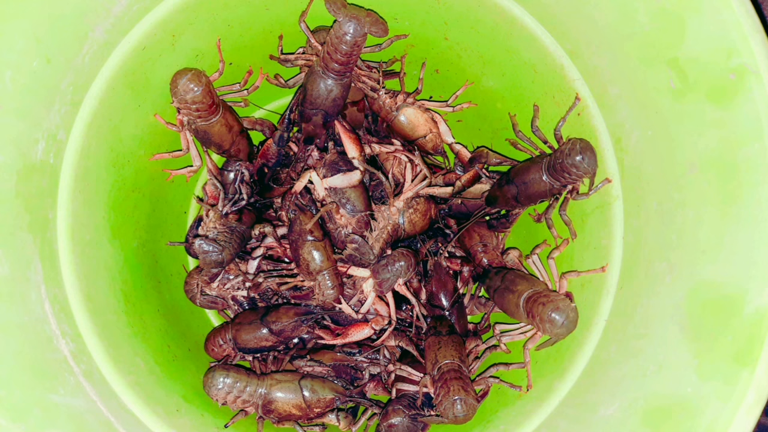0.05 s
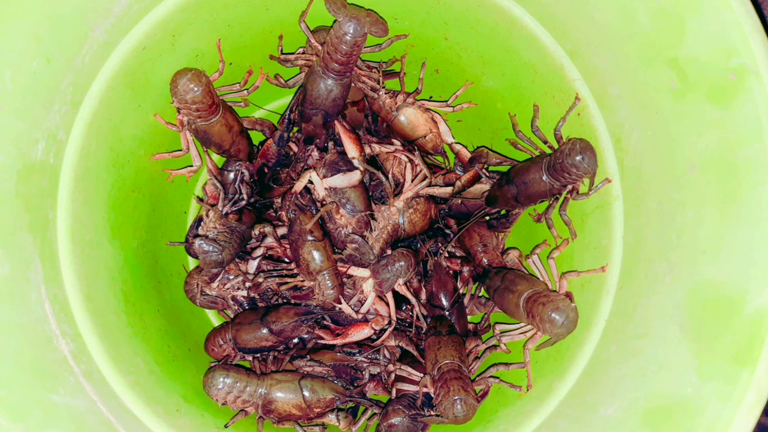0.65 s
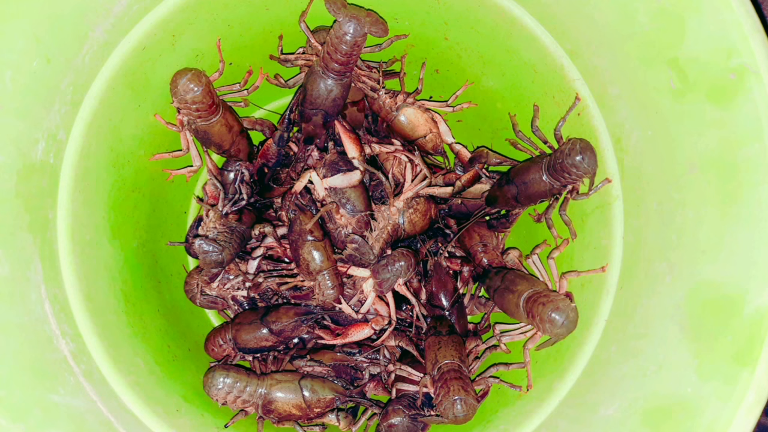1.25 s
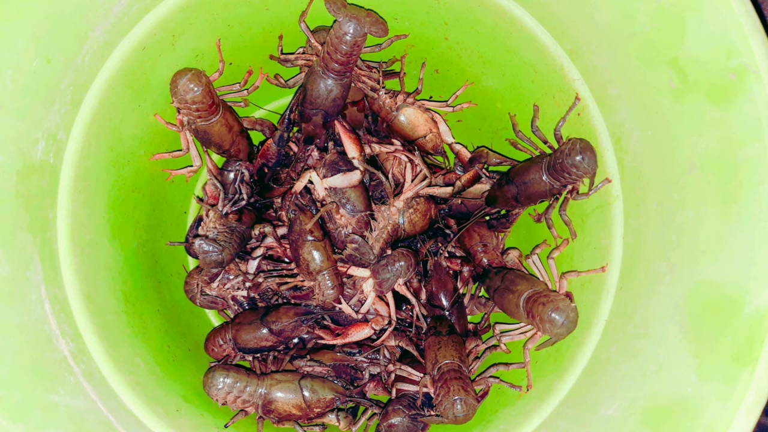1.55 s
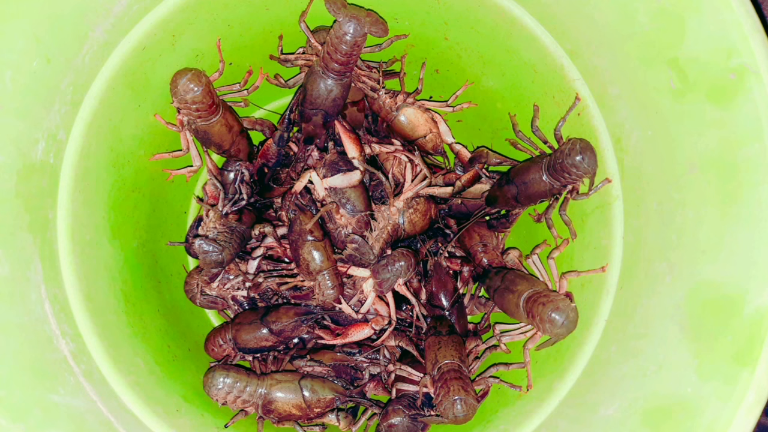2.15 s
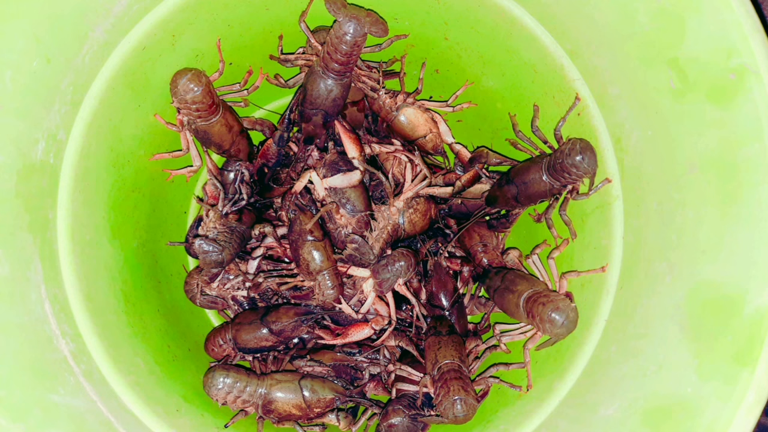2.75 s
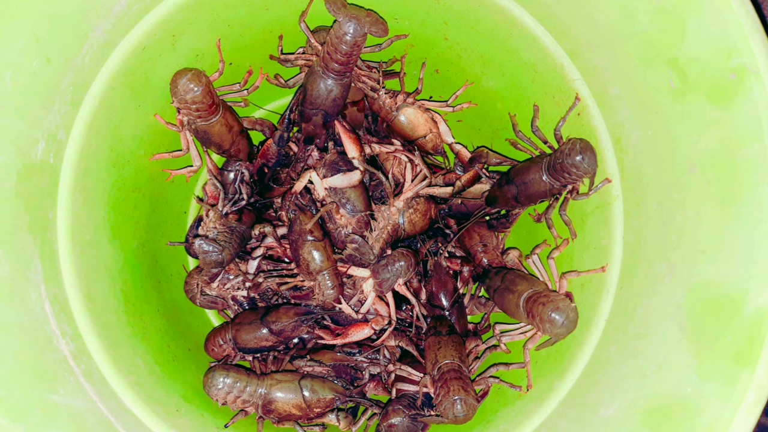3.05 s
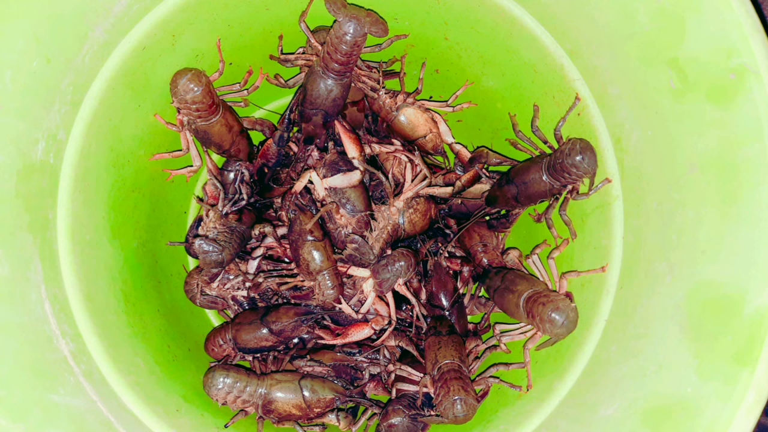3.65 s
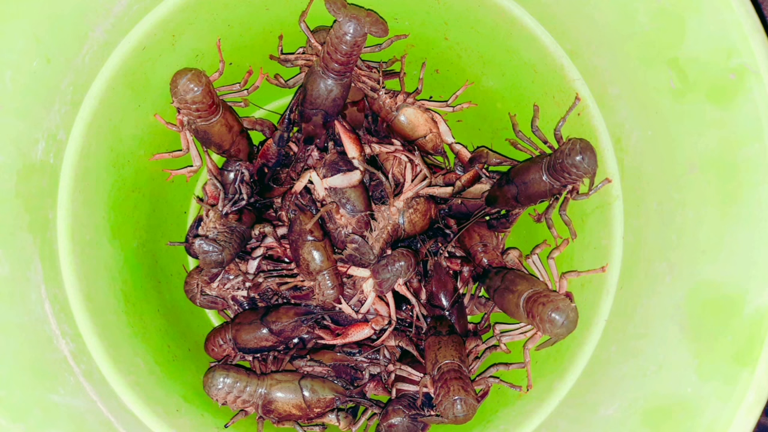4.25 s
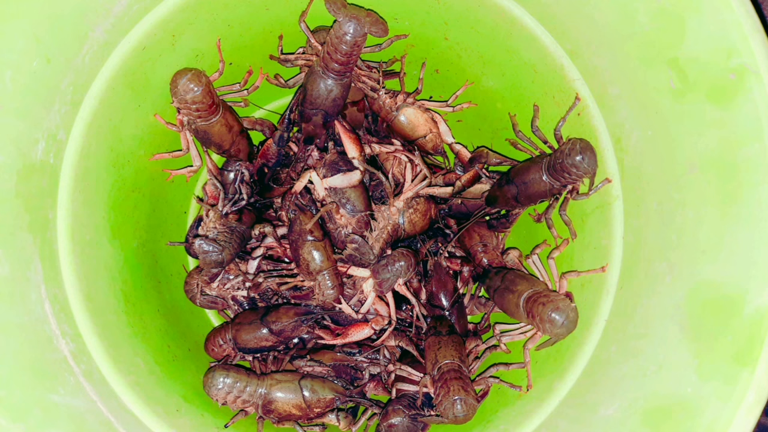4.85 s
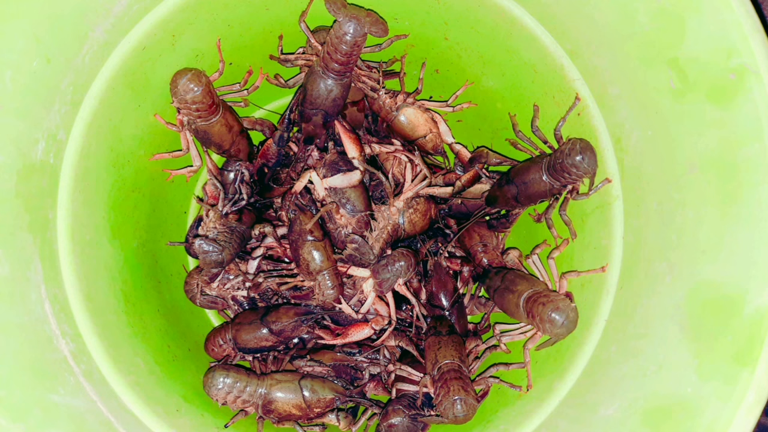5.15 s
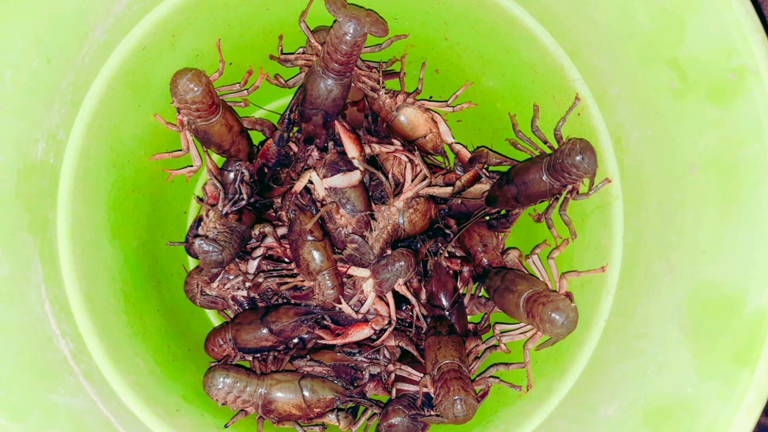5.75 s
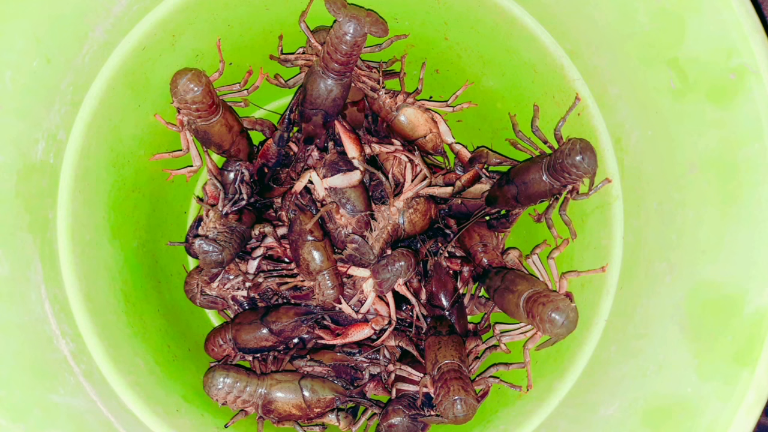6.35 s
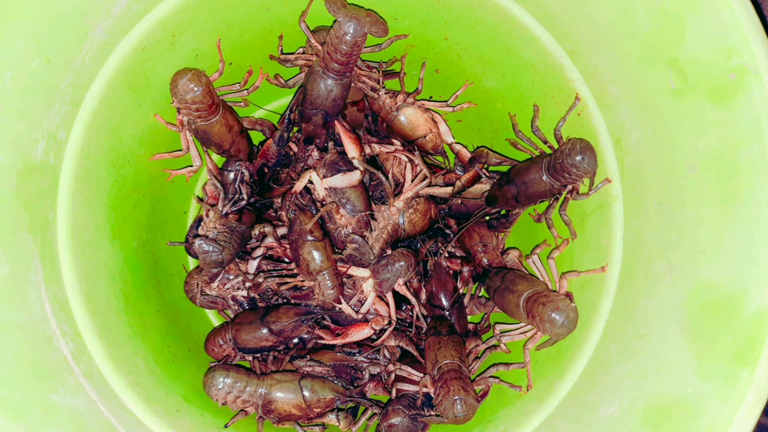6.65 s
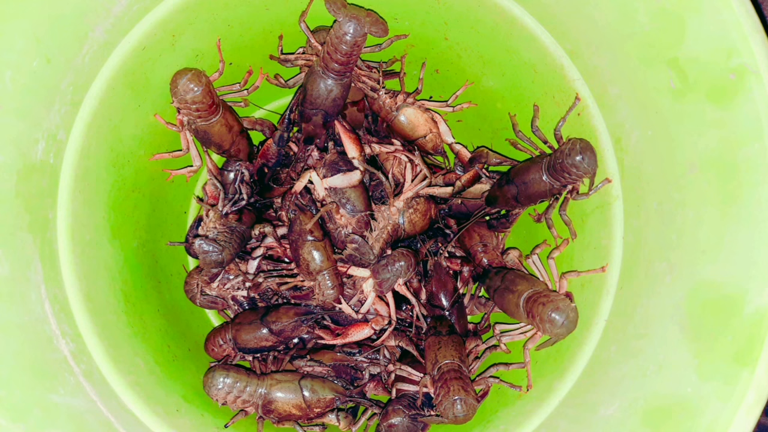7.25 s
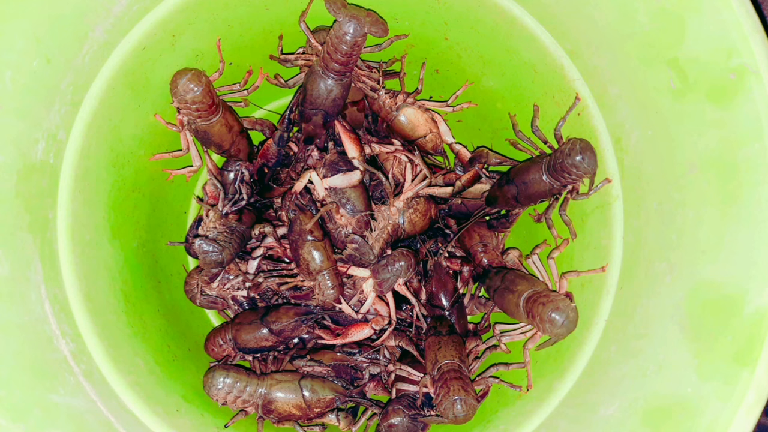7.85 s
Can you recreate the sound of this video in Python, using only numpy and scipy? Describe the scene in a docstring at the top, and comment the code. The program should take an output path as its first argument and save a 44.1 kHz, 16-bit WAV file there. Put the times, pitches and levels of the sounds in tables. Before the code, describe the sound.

Close, wet scrabbling of crawfish in a plastic bucket, their legs pattering, shells scraping and claws clicking, with one hard, hollow knock.

```python
"""A close, wet scrabble: live crawfish crawl over one another in a plastic bucket, heard in stereo from
just above the rim. Legs patter on the plastic and ring the air inside; claws tap and knock; wet shells
rub, crackle, tick, pop and scrape. The scrabble and the bucket's low rumble swell whenever an animal
heaves itself over the others. Now and then a body bumps the wall with a hollow note, once hard."""
import sys
import numpy as np
from scipy import signal
from scipy.fft import rfft, irfft
from scipy.io import wavfile
from scipy.ndimage import uniform_filter1d

SR = 44100
rng = np.random.default_rng(int(sys.argv[2]) if len(sys.argv) > 2 else 0)


def inscribe(sig):
    """Save sig as 16-bit PCM at rate SR to the path in sys.argv[1].

    A 1-D sig is mono; a 2-D sig holds one channel per row.
    Samples are clipped to [-1, 1] before scaling.
    """
    pcm = np.round(np.clip(np.atleast_2d(sig).T, -1, 1) * 32767)
    wavfile.write(sys.argv[1], SR, pcm.astype(np.int16))


N = 353682

# tone curves, each f/Hz, level/dB
HISS_EQ = [(18, -69), (30, -30), (86, -8), (227, -16), (355, 0), (600, -14.5), (1320, -6.5), (1590, -29),
           (2060, -35), (2680, -35), (3060, -11), (8300, -31.5), (16000, -37)]  # the faint bed
RUMBLE_EQ = [(12, -66), (20, -47), (54, -7.5), (108, -5.5), (227, -6.5), (280, -10.5), (360, -30),
             (620, -120)]  # the shifting bucket
SLAP_EQ = [(20, -22), (70, -8), (170, 5), (520, 3), (820, 1), (1200, 10), (2300, 6), (3500, 0),
           (7000, -11.5), (15000, -19)]  # shell slapping the wall
RUB_EQ = [(300, -22.5), (780, -30), (1250, -15.5), (1600, 4), (2100, -5.5), (2700, -7.5), (3300, -6),
          (4500, -11), (8000, -38)]  # shell rubbing shell
CRACKLE_EQ = [(1200, -8.5), (2500, -3), (4300, 3), (6500, -2), (8400, -0.5), (9600, -7.5), (13000, -3),
              (16000, -7)]  # water films cracking
BUCKET_EQ = [(400, -2), (680, -1), (950, -1.5), (1370, -5.5), (1540, -0.5), (1800, 0.5), (2030, -2),
             (2300, 1), (2460, -3), (2620, 1), (2820, 0), (3120, -6.5), (3260, -1.5), (3600, -4),
             (4500, -0.5)]  # the bucket's colour, with dips near 1.4 and 3.1 kHz
# air modes; the crosswise part is in opposite phase left and right: f/Hz, t60/s, level/dB, crosswise/0-1
AIR_MODES = [(342, 0.052, 4.5, 0.17), (359.8, 0.055, 2.5, 0.15), (620, 0.026, -12, 0.43),
             (977, 0.023, 2, 0.74), (1271, 0.019, 6.5, 0.87), (1562.4, 0.045, -1.5, 0.24),
             (2245, 0.012, 6, 0.8), (2640, 0.016, -2.5, 0.42)]
# the scrabbling between heaves: t/s, level/dB
SCRABBLE = [(0, -48), (.8, -54.5), (1.45, -45.5), (2.1, -52), (2.85, -47.5), (3.6, -44), (4.1, -53),
            (5.1, -52), (5.65, -54.5), (6.3, -46.5), (7.5, -41), (8.02, -55)]
# an animal heaves itself over the others: t/s, length/s, weight on the plastic/dB, shell rubbing/dB
BODY_HEAVES = [(0, 0.051, -51, -58), (0.144, 0.22, -49, -46.5), (0.498, 0.08, -47.5, -46),
               (.6, 0.093, -48, -73), (0.849, 0.28, -51.5, -47), (1.197, 0.092, -51.5, -48.5),
               (1.412, 0.36, -51.5, -50), (1.847, 0.38, -52, -52), (2.358, 0.12, -56, -44.5),
               (2.513, 0.39, -53.5, -45.5), (3.081, 0.05, -46, -98), (3.226, 0.19, -45, -45),
               (3.61, 0.36, -48.5, -45.5), (3.905, 0.19, -50, -71), (4.219, 0.34, -49, -51.5),
               (4.645, 0.37, -53, -50), (5.117, 0.29, -54, -51.5), (5.698, 0.091, -53, -44),
               (5.859, 0.31, -48.5, -46), (6.096, 0.23, -56, -45.5), (6.655, 0.18, -46, -43),
               (6.85, 0.28, -74, -47.5), (7.031, 0.088, -51, -42), (7.172, 0.055, -68, -46.5),
               (7.307, 0.22, -47.5, -46), (7.549, 0.34, -49, -44), (7.925, 0.066, -46, -42)]
# the base flexes: t/s, level/dB, f/Hz
BASE_THUDS = [(0.629, -40, 252), (1.582, -35, 108), (3.09, -53, 83), (6.165, -42.5, 97)]
# a foot or a body bumps the plastic: t/s, level/dB, brightness/dB
WALL_BUMPS = [(.046, -39, -27), (.247, -41, -32), (.356, -42, -32), (.514, -40, -40), (.576, -40, -30),
              (.875, -40, -30), (1.058, -41, -26), (1.454, -33.5, -5), (1.534, -38.5, -23),
              (1.635, -40.5, -18), (2.062, -41.5, -28), (2.185, -42.5, -19), (2.551, -41, -30),
              (2.849, -39.5, -28), (3.102, -41, -31), (3.127, -43, -30), (3.27, -37, -25),
              (3.391, -40, -26), (3.658, -39, -33), (3.72, -32, -15.5), (3.828, -34, -26),
              (3.907, -35.5, -19), (3.986, -42, -16), (4.23, -36.5, -13), (4.262, -43, -10),
              (4.691, -38, -51), (5.323, -27.5, -16), (5.723, -34.5, -9.5), (5.878, -38, -22),
              (5.913, -34.5, -22), (5.974, -27.5, -18), (6.113, -36, -25), (6.128, -9, -18),
              (6.28, -46, -28), (6.647, -37, -10), (7.245, -41, -24), (7.376, -38, -19), (7.48, -35.5, -24),
              (7.74, -38.5, -22), (7.813, -37.5, -28), (7.939, -37, -36), (7.958, -35, -30),
              (7.993, -31.5, -28)]
# a claw knocks on the plastic: t/s, level/dB, f/Hz
CLAW_KNOCKS = [(1.989, -42.5, 940), (3.699, -38.5, 920), (3.908, -35, 950), (4.086, -41.5, 1040),
               (4.231, -34.5, 860), (4.265, -36.5, 895), (4.279, -37, 810), (4.301, -39, 890),
               (5.323, -32, 920), (6.596, -39, 900), (7.366, -38, 1030), (7.451, -37, 1120)]
# a shell drags over shell or plastic: t/s, length/s, level/dB, f/Hz, crest position/0-1
SHELL_DRAGS = [(0.498, 0.076, -33, 1970, 0.65), (2.337, 0.022, -29, 3300, 0.3),
               (2.675, 0.076, -35.5, 2680, 0.46), (2.807, 0.071, -29.5, 1780, 0.1),
               (3.624, 0.017, -32, 3400, 0.5), (3.701, 0.024, -32.5, 3530, 0.64),
               (3.726, 0.042, -29.5, 1850, 0.18), (4.23, 0.23, -38, 2520, 0.18),
               (4.256, 0.1, -49, 1000, 0.2), (4.752, 0.021, -38.5, 3200, 0.2),
               (4.844, 0.027, -31.5, 2000, 0.78), (5.199, 0.033, -29, 2150, 0.6),
               (5.2, 0.035, -33, 5030, 0.2), (5.299, 0.03, -29.5, 2840, 0.8),
               (5.318, 0.007, -39, 11500, 0.4), (5.358, 0.065, -34.5, 1870, 0.56),
               (5.485, 0.033, -34.5, 1980, 0.87), (5.517, 0.034, -33.5, 3130, 0.58),
               (5.721, 0.067, -36, 2600, 0.3), (6.323, 0.062, -31, 2320, 0.3),
               (6.763, 0.12, -30, 2600, 0.23), (6.753, 0.083, -40, 6500, 0),
               (6.891, 0.031, -32.5, 2030, 0.3), (7.025, 0.13, -30, 1780, 0.86),
               (7.32, .042, -25.5, 3330, 0.45), (7.436, .11, -34.5, 2850, 0.14),
               (7.44, 0.19, -33.5, 1150, 0.12), (7.672, 0.073, -30.5, 1530, 0.1),
               (7.818, 0.048, -29, 1750, 0.26)]
# the sharpest ticks of wet joints: t/s, level/dB, f/Hz
JOINT_TICKS = [(0.0294, -43.5, 11700), (0.0745, -49, 4800), (0.086, -36.0, 7060), (0.1531, -43, 9850.0),
               (0.278, -39, 5300), (0.3807, -42.5, 7360), (0.4113, -39.5, 4890.0), (0.9387, -37.5, 5000),
               (0.9895, -40, 8800), (1.037, -39, 6600), (1.2806, -46, 12800), (1.2947, -42.5, 7700),
               (1.4085, -31.5, 8700), (1.4476, -37.0, 5400), (1.533, -38.5, 7600), (1.733, -45, 6200),
               (1.802, -42, 6600), (1.8458, -36.5, 5700), (1.909, -37, 4970), (1.9857, -43, 4970),
               (2.0439, -36, 7740), (2.2342, -39.5, 3920), (2.3196, -41, 7650), (2.3455, -32, 4430),
               (2.3716, -37.5, 4830), (2.399, -34, 4300), (2.4098, -33.5, 5300), (2.4595, -43, 5750.0),
               (2.472, -38.5, 13300), (2.6055, -37, 10200), (2.649, -38.5, 8950), (2.732, -39, 7700),
               (2.9136, -34.5, 5300), (3.304, -39, 13500), (3.351, -41, 9300), (3.39, -45, 9600),
               (3.8401, -42.5, 8350), (3.942, -36.5, 5160), (4.0698, -38, 12600), (4.297, -39, 7500),
               (4.6176, -41.5, 8070.0), (4.713, -41.0, 6860), (4.724, -37, 6900), (4.957, -42, 7540.0),
               (5.012, -40, 7120.0), (5.1695, -37.5, 5500), (5.3078, -40.5, 5500), (5.3276, -36, 12800),
               (5.4641, -40.5, 8500), (5.5827, -45, 8350), (5.69, -39.5, 8000), (5.8143, -41, 7000),
               (5.8766, -43.5, 5520.0), (5.9124, -33.5, 3850), (5.9243, -42, 5900), (6.0316, -33, 4860),
               (6.0643, -43, 5800), (6.4332, -39.0, 4970), (6.5588, -38, 6050), (6.7744, -35, 4200),
               (6.8024, -39, 9250), (7.075, -33, 6100), (7.2617, -36, 7900), (7.4433, -34, 6300),
               (7.563, -36.5, 7000), (7.6736, -42, 8280.0), (7.9975, -36, 5560)]
# the loudest claw taps: t/s, level/dB, f/Hz, crack against tap/dB, left minus right/dB
CLAW_TAPS = [(0.191, -27.5, 1740.0, -28, -4), (0.246, -27, 1730, -13, -3), (0.3296, -30, 1760, -16, -2),
             (0.3559, -32.5, 1690.0, -24, 0), (0.3668, -31.5, 1660, -21, 0), (0.4258, -33.5, 1700, -11, -4),
             (0.556, -33, 1630, -14, -7), (0.5765, -30.0, 1710.0, -9, -3), (0.612, -31.5, 1820, -11.5, -1),
             (0.6714, -30.5, 1880, -8.5, 0), (0.7108, -32.5, 1740, -15, -3), (0.7639, -38.0, 2000, -14, 2),
             (0.8662, -35.0, 1670.0, -22, 1), (0.9067, -29.5, 1770, -18, 2), (0.9663, -31.5, 1600, -23, 0),
             (1.0008, -28.5, 1760, -24, -1), (1.3237, -31.5, 1550, -32, -1), (1.4596, -25.5, 1580, -31, -4),
             (1.6934, -29.5, 1670, -34, -5), (1.854, -43.5, 2300, 7, 3), (2.1854, -32, 1700, -7, -4),
             (2.338, -34.5, 2630, -8, 1), (2.3993, -31, 2400, -6, 6), (2.5257, -43, 2180.0, -21, 2),
             (2.6647, -28, 2110, -14, 3), (2.8504, -24, 1730, -17, 0), (2.8673, -27.5, 1710, -24, -2),
             (2.9624, -33.5, 2720, -4.5, -7), (3.0613, -32, 1760, -28, -3), (3.0983, -25.5, 2270, -3, 7),
             (3.1114, -37, 1730, -17, -9), (3.265, -32, 1700.0, -1.5, 3), (3.354, -30, 1770, -12, 5),
             (3.3863, -35.5, 1770, 5, -1), (3.4376, -37.5, 2770, -28, -6), (3.6283, -39, 2030, -18, -2),
             (3.7167, -23.5, 1680.0, -3, 3), (3.7916, -31, 2020, -23, 6), (3.8244, -30, 2120, -24, 0),
             (4.0711, -36.0, 2560, -15, -2), (4.1855, -33.5, 1670, -11, -2), (4.2304, -35.5, 2770, -10, -4),
             (5.2008, -28, 1900, -5.5, 2), (5.7219, -31, 1900, -5, 8), (5.7708, -28, 1930, -12, 9),
             (5.8695, -29.0, 1690, -24, -3), (5.9017, -38, 2750, -20, 6), (6.2414, -28.0, 1730, -24, -10),
             (6.2525, -26.5, 2230, -6.5, 7), (6.2846, -26.0, 1860, -17, 3), (6.361, -32, 1690, -27, -11),
             (6.4874, -30.5, 1920.0, -7, 6), (6.502, -33.0, 1670, -29, -3), (6.5876, -26.5, 2040, -19, 1),
             (6.648, -30, 2200, -3, 0), (6.724, -30.5, 1590, -3.5, -4), (6.8587, -26.5, 2340, -11.5, -3),
             (6.9125, -31.5, 1940, -11, -1), (7.0922, -29, 1940.0, -8, 4), (7.2423, -36, 1630, -18, -13),
             (7.296, -27, 1650, -7, 1), (7.3372, -33, 2420, -18, 3), (7.4546, -33, 1870, -22, 2),
             (7.6451, -31, 1760.0, -20, 5), (7.7064, -25.5, 1710.0, -21, -3), (7.778, -24.5, 1750, -42, 0),
             (7.8104, -27.5, 1750, -25, 1), (7.9477, -37, 1980, -9, 3)]

HEAVE_ATTACK_S, HEAVE_RELEASE_S, HEAVE_SAG_DB_PER_S = 0.0096, 0.042, 1
RESTING_WEIGHT_DB = -11.5  # footfalls between heaves, against the scrabbling
RUMBLE_DB, RUMBLE_PER_WEIGHT = -62.5, 0.87  # base level; dB gained per dB of weight
CRACKLE_DB, CRACKLE_PER_RUB, CRACKLE_PER_WEIGHT = -54.5, 0.45, 0.13  # base level; dB gained per dB of each
TICK_PAN_SPREAD_DB = 4.5
AIR_DETUNE = 0.0046  # relative scatter of the modes from one contact to the next
SOFT_BODY_HZ = 2300  # a body is too soft to ring the modes much above this
TOP_HZ = 16000


def amp(db):
    """Decibels to gain."""
    return 10 ** (np.asarray(db) / 20)


def unit(x):
    """Scale to rms 1."""
    return x / np.sqrt(np.mean(x ** 2) + 1e-20)


def convolve(x, response):
    """Pass x through a mono or stereo impulse response."""
    return signal.oaconvolve(np.atleast_2d(x), np.atleast_2d(response), axes=1)[:, :x.shape[-1]]


def colour(x, points, size=2048):
    """Minimum-phase EQ through points of f/Hz, level/dB."""
    hz, db = np.transpose(points)
    gain = amp(np.interp(np.log(np.fft.rfftfreq(size, 1 / SR) + 1), np.log(hz), db))
    fold = 1 + np.sign(size // 2 - np.arange(size))
    fold[0] = 1
    cepstrum = irfft(np.log(gain)) * fold
    return convolve(x, irfft(np.exp(rfft(cepstrum))))


def steady(x, span_s):
    """Ride the level towards rms 1 over span_s, leaving single grains standing."""
    power = uniform_filter1d(np.mean(x ** 2, axis=0), max(int(span_s * SR), 2))
    return x / np.sqrt(np.abs(power) + np.mean(power) / 20)


def add(out, s, sound, db, pan_db=0):
    """Place a stereo sound at time s, levelled by its envelope peak; positive pan_db leans left."""
    part = out[:, max(round(s * SR), 0):][:, :sound.shape[1]]
    power = uniform_filter1d(np.mean(sound ** 2, axis=0), size=132, mode="constant")
    gain = amp(db + np.array([[pan_db], [-pan_db]]) / 2) / np.sqrt(2 * power.max())
    part += (gain * sound)[:, :part.shape[1]]


def ping(hz, cycles, size=1024):
    """A small contact: a sine that swells for the given cycles and dies again."""
    turns = np.asarray(hz)[..., None] * np.arange(size) / SR
    u = turns / cycles
    return np.sin(2 * np.pi * turns) * u * u * np.exp(2 - 2 * u)


def grains(count, length, hz, octaves, cycles, range_db, size=256):
    """A cloud of pings over length samples, scattered in pitch and strength."""
    start = rng.integers(0, length, count)
    pitch = np.minimum(hz * 2 ** (octaves * rng.standard_normal(count)), TOP_HZ)
    strength = amp(-range_db * rng.random(count)) * pitch / hz * rng.choice([-1, 1], count)
    waves = strength[:, None] * ping(pitch, cycles, size)
    return np.bincount((start[:, None] + np.arange(size)).ravel(), waves.ravel(), length + size)[:length]


def background(weight_db):
    """The shifting bucket rumbles with the weight on it, over a faint, even hiss."""
    noise = rng.standard_normal(N) + 0.78 * rng.standard_normal((2, N))
    rumble_db = RUMBLE_DB + RUMBLE_PER_WEIGHT * (weight_db - weight_db.mean())
    rumble = amp(rumble_db) * unit(colour(noise, RUMBLE_EQ)) * amp([[-1], [1]])
    hiss = amp(-63) * unit(colour(rng.standard_normal((2, N)), HISS_EQ))
    return rumble + hiss


def room(bucket, t60=0.25):
    """The room's faint answer: a short, diffuse tail."""
    t = np.arange(SR // 3) / SR
    tail = rng.standard_normal((2, len(t))) * amp(-60 * t / t60)
    return amp(-26) * convolve(bucket, tail / np.linalg.norm(tail[0]))


def walls(echo_db, t60=0.033, size=2600):
    """The paths from one spot in the heap to both microphones: direct, then dense wall reflections."""
    t = np.arange(size) / SR
    tail = rng.standard_normal((2, size)) * amp(-60 * t / t60) * (1 - np.exp(-t / .0012))
    paths = amp(echo_db) * tail / np.linalg.norm(tail[0])
    paths[[0, 1], rng.integers(0, 9, 2)] += 1  # the direct sound
    return paths


def air_ring(bright_db, vary_db, swell_cycles, soft_hz=TOP_HZ, size=5000):
    """The bucket's ring from one spot, which sets each mode's strength and its crosswise sign."""
    t = np.arange(size) / SR
    hz, t60, db, cross = np.transpose(AIR_MODES)[:, :, None]
    hz = hz * (1 + AIR_DETUNE * rng.uniform(-0.86, 1, hz.shape))
    tilt = np.clip(np.log2(hz / hz[1]) / 2, 0, 1)
    level = amp(db + bright_db * tilt + vary_db * rng.standard_normal(hz.shape) - 60 * t / t60)
    level /= 1 + (hz / soft_hz) ** 6
    level *= 1 - np.exp(-(t * hz / swell_cycles) ** 2)  # a mode builds up over some round trips
    phase = 2 * np.pi * hz * t
    mid = np.sum((1 - cross) * level * -np.sin(phase), axis=0)
    side = np.sum(cross * rng.choice([-1, 1], hz.shape) * level * np.cos(phase), axis=0)
    return np.array([mid + side, mid - side])


def small_contacts(per_second, hz, octaves, cycles, range_db, spots=8):
    """Single contacts at random moments and spots in the heap, the strongest of peak 1."""
    each = max(int(per_second * N / SR / spots), 1)
    out = np.zeros((2, N))
    for _ in range(spots):
        out += convolve(grains(each, N, hz, octaves, cycles, range_db, size=600), walls(echo_db=6))
    return out / np.abs(out).max()


def stray_clicks(rub_db):
    """Wet pops, dry ticks and fine sparks of the leg tips, stronger when the shells rub harder."""
    pops = amp(-34.5) * small_contacts(per_second=24, hz=2440, octaves=0.315, cycles=3.6, range_db=6.5)
    ticks = amp(-43.5) * small_contacts(per_second=23, hz=5470, octaves=0.21, cycles=2.4, range_db=22)
    sparks = amp(-52.5) * small_contacts(per_second=40, hz=12100, octaves=0.2, cycles=2.2, range_db=7)
    push_db = rub_db - rub_db.mean()
    return amp(0.37 * push_db) * (pops + ticks) + amp(0.21 * push_db) * sparks


def base_thuds():
    """The base flexes under the shifting load: soft, low and dead centre."""
    out = np.zeros((2, N))
    for s, db, hz in BASE_THUDS:
        add(out, s, np.tile(ping(hz, cycles=0.88, size=6000), (2, 1)), db)
    return out


def wall_bumps(slap_t60=0.036):
    """A body against the wall: the hollow ring of the bucket under a short slap of shell."""
    out = np.zeros((2, N))
    for s, db, bright_db in WALL_BUMPS:
        ring = air_ring(bright_db + 13.5, vary_db=-0.5, swell_cycles=1.55, soft_hz=SOFT_BODY_HZ)
        t = np.arange(ring.shape[1]) / SR
        noise = rng.standard_normal(len(t)) + .6 * rng.standard_normal(ring.shape)
        slap = colour(noise * amp(-60 * t / slap_t60), SLAP_EQ)
        add(out, s, ring + amp(bright_db + 6) * slap, db + 1.8)
    return out


def claw_knocks():
    """A claw on the plastic: a woody note of a few cycles with little echo."""
    out = np.zeros((2, N))
    for s, db, hz in CLAW_KNOCKS:
        add(out, s, convolve(ping(hz, cycles=1.05, size=2600), walls(echo_db=-9)), db - 3)
    return out


def shell_scrapes():
    """A drag is a run of pitched slips with grit on top; it crests, then fades as the shell settles."""
    out = np.zeros((2, N))
    for s, length, db, hz, crest in SHELL_DRAGS:
        size = int(length * SR)
        pressure = np.interp(np.arange(size) / size, [0, np.clip(crest, .05, .95), 1], [.25, 1, .12])
        slips = grains(int(1200 * length) + 1, size, hz, octaves=0.29, cycles=1.3, range_db=16, size=400)
        grit = grains(int(1400 * length) + 1, size, 2.34 * hz, octaves=0.38, cycles=0.74, range_db=2)
        drag = np.pad(pressure * (slips + amp(-11.5) * grit), (0, SR // 20))
        add(out, s, convolve(drag, walls(echo_db=1)), db - 1.5)
    return out


def joint_ticks(swell_s=0.0011, size=500):
    """A wet joint gives way in a quick cluster of tiny, bright snaps around one pitch."""
    out = np.zeros((2, N))
    u = np.arange(size) / SR / swell_s
    for s, db, hz in JOINT_TICKS:
        snaps = grains(60, size, hz, octaves=0.26, cycles=1.4, range_db=8, size=128)
        crunch = np.pad(snaps * u * u * np.exp(-2 * u), (0, SR // 20))
        tick = convolve(crunch, walls(echo_db=-1))
        add(out, s, tick, db + 0.26, TICK_PAN_SPREAD_DB * rng.standard_normal())
    return out


def slip(swell_s, eq, size=2600):
    """A shell slips off its hold: a noise burst of peak 1 that swells and dies within milliseconds."""
    u = np.arange(size) / SR / swell_s
    burst = colour(rng.standard_normal(size) * u * u * np.exp(-2 * u), eq)[0]
    return burst / np.abs(burst).max()


def claw_taps():
    """Claws tap plastic and shell, from clean to raspy, with a crack on top and a stir of the air."""
    out = np.zeros((2, N))
    for s, db, hz, crack_db, pan_db in CLAW_TAPS:
        note = ping(hz, cycles=rng.uniform(1.96, 3.4), size=2600)
        overtone = 0.25 * ping(hz * rng.uniform(1.225, 1.8), cycles=3.1, size=2600)
        rasp = 1.65 * amp(crack_db / 2) * slip(0.0018, RUB_EQ)  # a harder crack, a less pitched tap
        crack = slip(0.0019, CRACKLE_EQ)
        paths = walls(echo_db=-2)
        add(out, s, convolve(note + overtone + rasp, paths), db - .3, pan_db)
        add(out, s, convolve(crack, paths), db + crack_db + .8)
        add(out, s, air_ring(bright_db=-3, vary_db=3, swell_cycles=1.5), db - 18)
    return out


def effort():
    """Weight on the plastic and shell rubbing, in dB: each heave sets in quickly, tires and lets go."""
    t = np.arange(N) / SR
    scrabble_db = np.interp(t, *np.transpose(SCRABBLE))
    power = amp([scrabble_db + RESTING_WEIGHT_DB, scrabble_db]) ** 2
    for s, length, weight_db, rub_db in BODY_HEAVES:
        age = np.maximum(t - s, 0)
        attack = np.minimum(age / HEAVE_ATTACK_S, 1)
        sag = amp(-HEAVE_SAG_DB_PER_S * age)
        release = np.exp(-np.maximum(age - length, 0) / HEAVE_RELEASE_S)
        power += (amp([[weight_db], [rub_db]]) * attack * sag * release) ** 2
    return 10 * np.log10(power)


def patter(bright_db, range_db, steps, spots=8):
    """Legs step at several spots on the plastic, each ringing the bucket in its own way."""
    out = np.zeros((2, N))
    for _ in range(spots):
        starts = rng.integers(0, N, steps)
        force = amp(-range_db * rng.random(steps)) * rng.choice([-1, 1], steps)
        out += convolve(np.bincount(starts, force, N), air_ring(bright_db, vary_db=2, swell_cycles=1.3))
    return out


def footfalls(weight_db, rub_db):
    """Dull steps follow the weight, bright ones the rubbing; both sit a little to the right."""
    dull = steady(patter(bright_db=-14, range_db=19, steps=150), span_s=0.147)
    bright = patter(bright_db=-0.5, range_db=9.5, steps=220)
    bright = steady(colour(bright, [(300, -17.5), (700, -3.5), (950, -5)]), span_s=0.22)
    return (amp(weight_db - 2.5) * dull + amp(rub_db - 2) * bright) * amp([[-.8], [.8]])


def strokes(per_second, width_s):
    """Legs move in fits: brief pushes of uneven force."""
    count = int(per_second * N / SR)
    force = np.bincount(rng.integers(0, N, count), rng.random(count), N)
    u = (np.arange(SR // 20) - SR // 40) / SR / width_s
    return convolve(force, np.exp(-u * u))[0]


def wet_rubbing(weight_db, rub_db, spots=8):
    """The restless heap: each stroke of a leg both rubs shell and cracks water films."""
    drag = 0.087 * amp(rub_db - np.median(rub_db))  # the busier the heap, the more the strokes run together
    rub, crackle = np.zeros((2, 2, N))
    for _ in range(spots):
        force = drag + strokes(per_second=24, width_s=0.0027)
        paths = walls(echo_db=-1)
        shell = grains(4500, N, hz=2175, octaves=0.53, cycles=1.17, range_db=13)
        films = grains(12000, N, hz=7420, octaves=0.726, cycles=1.6, range_db=14, size=120)
        rub += convolve(force * shell, paths)
        crackle += convolve(force * films, paths)
    crackle_db = CRACKLE_DB + CRACKLE_PER_RUB * (rub_db - rub_db.mean())
    crackle_db += CRACKLE_PER_WEIGHT * (weight_db - weight_db.mean())
    rub = amp(rub_db) * steady(colour(rub, RUB_EQ), span_s=0.223)
    crackle = amp(crackle_db) * steady(colour(crackle, CRACKLE_EQ), span_s=0.2)
    return rub + crackle * amp([[.6], [-.6]])


def scene():
    """The mix: shells coloured by the bucket, hits on the plastic, a touch of room and the low bed."""
    weight_db, rub_db = effort()
    contacts = stray_clicks(rub_db) + claw_taps() + joint_ticks() + shell_scrapes()
    steps = footfalls(weight_db, rub_db)
    shells = colour(contacts + wet_rubbing(weight_db, rub_db), BUCKET_EQ)
    bucket = steps + shells + claw_knocks() + wall_bumps() + base_thuds()
    return bucket + room(bucket) + background(weight_db)


def record(dry):
    """A brick-wall high cut at TOP_HZ."""
    return irfft(rfft(dry) * (np.fft.rfftfreq(N, 1 / SR) < TOP_HZ), N)


dry = scene()
out = record(dry)
inscribe(out)
```